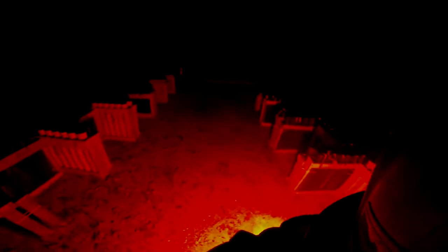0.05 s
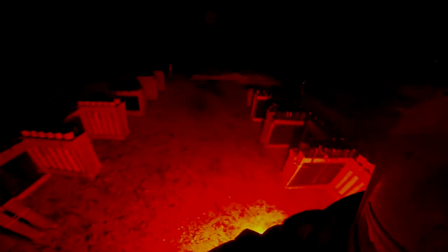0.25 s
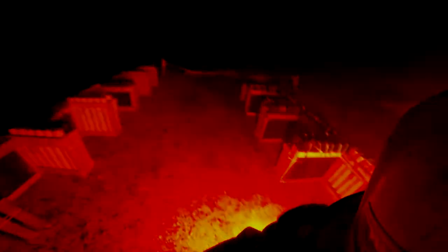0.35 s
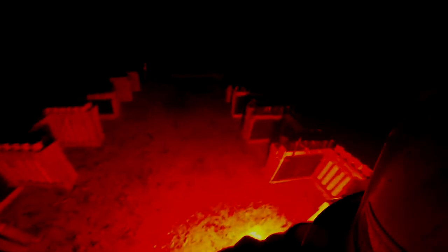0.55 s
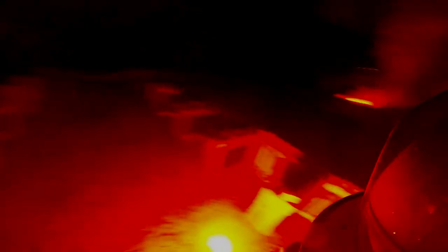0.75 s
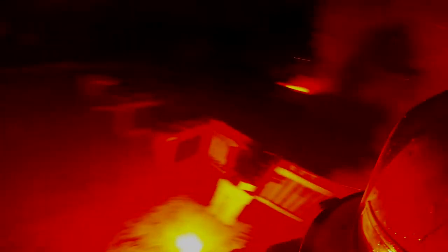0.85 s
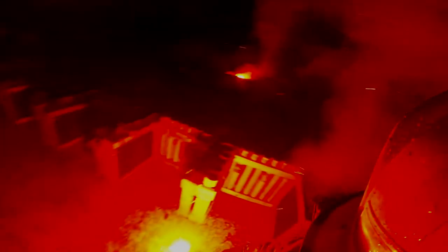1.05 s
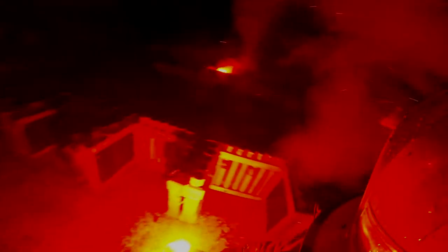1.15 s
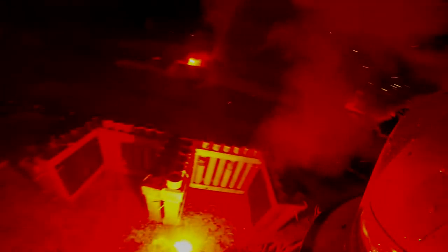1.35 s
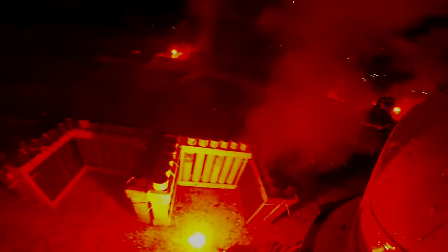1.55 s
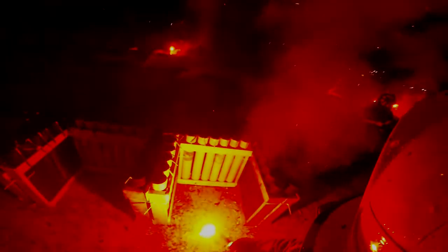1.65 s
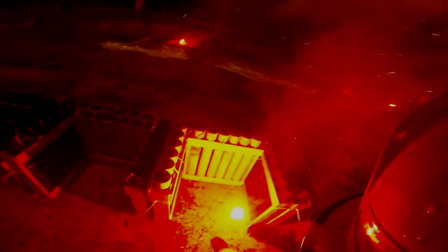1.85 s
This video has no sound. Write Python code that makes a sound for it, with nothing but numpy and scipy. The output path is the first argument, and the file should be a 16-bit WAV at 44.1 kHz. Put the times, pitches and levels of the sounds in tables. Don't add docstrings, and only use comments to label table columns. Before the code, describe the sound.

Firework shells launching from mortar tubes, close, in an open field. Faint flare hiss and rumble, with a soft thump near 0.17 s; then a dense volley of hard, clipped cracks at 0.25-0.32 s, the last heaviest with a hollow tube thump. A smaller double crack comes at 0.48-0.49 s. Echoes roll and dull until about 1.1 s, leaving quiet far rumble, faint puffs near 1.27 and 1.5 s, and light wind buffeting.

```python
import sys
import numpy as np
from scipy import signal
from scipy.fft import rfft, irfft
from scipy.io import wavfile
from scipy.ndimage import uniform_filter1d

SR = 44100
rng = np.random.default_rng(int(sys.argv[2]) if len(sys.argv) > 2 else 0)


def boost_factor(decibels):
    exponent = np.asarray(decibels, float) / 20
    return 10 ** exponent


def unload_wav(signal):
    wavfile.write(
        sys.argv[1],
        SR,
        np.round(np.clip(np.atleast_2d(signal).T, -1, 1) * 32767).astype(np.int16),
    )


N = 85995

# start_s [s], front_db [dB], front_ms [ms], spray_db [dB], decay_ms [ms]
SHOCK_FRONTS = [(.0618, -37, .35, -41, 4), (.2455, -36, .1, -30, 4), (.2480, -24, .12, -26, 2),
                (.2514, -11, .15, -22, 5), (.2491, 1.5, .1, -22, 2), (.24955, -1, .07, -19, 1.5),
                (.2503, -8, .05, -21, 2), (.2585, -6, .12, -17, 3), (.2603, -7, .12, -18, 2),
                (.2619, 2, .17, -16, 2), (.2631, -7, .12, -17, 3), (.2654, -8, .14, -16, 3),
                (.2660, -9, .1, -18, 4), (.2745, -16, .12, -22, 3), (.2762, -14, .12, -18, 3),
                (.2801, -12, .15, -21, 4), (.3030, -30, .15, -26, 6), (.3079, -14, .3, -20, 2),
                (.3096, -4, .25, -16, 2), (.3113, 0, .1, -12, 2), (.3123, -6, .08, -12, 2),
                (.3135, -9, .08, -12, 2), (.3205, -22, .2, -24, 5), (.3144, -4, .2, -14, 1.5),
                (.3152, 2, .18, -16, 1), (.3161, 4, .5, -18, 1.5), (.3180, -4, .08, -11, 1),
                (.4833, -12, .12, -28, 3), (.48362, -3, .11, -22, 2.5), (.49425, -14, .1, -27, 3),
                (.49455, -16, .05, -25, 3)]
# freq_hz [Hz], gain_db [dB]
BLAST_COLOUR = [(200, 0.5), (600, -4), (1050, 2), (1550, 1), (2200, 6), (4000, 5.5), (12000, 6),
                (16000, 12)]
# pitch_hz [Hz], level_db [dB], t60_s [s]
SHELL_MODES = [(2943, -14.5, 0.01), (4720, -11, 0.0051), (8690, -13.5, 0.0089)]
SHARP_MS = 0.059

# start_s [s], level_db [dB], push_ms [ms], ring_hz [Hz]
THUMPS = [(.0, -63, 1.8, 195), (0.164, -30.5, 10, 136), (0.177, -34.5, 2.5, 200), (.2620, -31, 0.41, 280),
          (0.3088, -11.5, 0.41, 200), (0.3156, 2.5, 0.74, 215), (0.324, -16, 3.5, 100),
          (0.352, -24, 1.9, 111), (0.483, -8.5, 1.3, 216), (.4940, -8.5, 1.03, 221),
          (0.5015, -22.5, 1.35, 253), (.520, -32, 1.1, 200), (.557, -32.5, 2.6, 206),
          (0.679, -41, 1.2, 109), (1.109, -44, 4.1, 100)]
RING_CYCLES, RING_GAIN = 5.3, 0.57

# start_s [s], level_db [dB], pitch_hz [Hz], rise_ms [ms], decay_ms [ms]
RINGS = [(0.25, -18.5, 293, 1.3, 4.8), (.2590, -17.5, 547, 2.2, 2), (.2743, -8, 2850, 2.2, 3.2),
         (.2777, -17, 233, 1.2, 12.2), (.2777, -14, 1150, 1.5, 1.5), (.3094, -10, 1055, 4.5, 2.5),
         (.4840, -15, 2750, .6, 1.2), (.3077, -15, 720, 2, 2), (.062, -40, 1760, 0.91, 3.9),
         (.167, -42.5, 1594, 4.9, 8.5), (.2585, -22, 4800, 1.8, 5), (0.19, -46, 1600, 1.9, 4),
         (1, -40.5, 160, 3, 8), (1.013, -42, 166, 4, 10), (1.258, -43, 203, 4, 19),
         (1.291, -42, 130, 6.7, 13), (1.497, -38.5, 131, 5.1, 21), (1.265, -45.5, 2800, 1, 2.2)]

# freq_hz [Hz], t60_s [s]
YARD_DECAY = [(100, 0.35), (400, 0.22), (1500, 0.15), (5000, 0.28), (14000, 0.58)]
# freq_hz [Hz], gain_db [dB]
YARD_COLOUR = [(100, 7.5), (1000, 1.5), (5000, 8), (13000, 5.5)]
YARD_DB = -14.5

# start_s [s], level_db [dB], rise_s [s], decay_s [s]
FAR_BANGS = [(0.0, -34.5, 0.0027, 0.011), (.082, -43, 0.0053, .006), (.250, -32, .002, 0.0077),
             (.259, -19, .003, 0.011), (.272, -19, .003, 0.028), (0.312, -22, .002, 0.0047),
             (.163, -31.5, 0.0012, 0.012), (0.173, -33.5, 0.0025, 0.013), (0.197, -38, 0.003, 0.0029),
             (0.503, -27.5, 0.001, 0.0066), (.514, -30.5, 0.0034, 0.024), (0.547, -32, 0.0027, 0.0079),
             (0.556, -31, 0.0031, 0.0092), (0.633, -39.5, .003, 0.0034), (1.268, -50, 0.0035, .01),
             (1.49, -45.5, 0.015, 0.049)]
# freq_hz [Hz], gain_db [dB]
SCATTER_COLOUR = [(150, -18), (500, -9), (1500, -2), (4000, -1.5), (9000, -1.5), (15000, -18)]

# time_s [s], level_db [dB]
ROLL_LEVEL = [
    (0.0, -59),
    (0.26, -53),
    (0.362, -50.5),
    (0.792, -49),
    (0.916, -49),
    (1.058, -54),
    (1.51, -55.5),
    (1.95, -58.5),
]
# freq_hz [Hz], gain_db [dB]
ROLL_COLOUR = [(60, 17.5), (200, -20.5), (500, -4.5), (1000, -3.5), (3000, 3), (6500, 2.5), (8000, -9.5),
               (15000, -29)]
ROLL_LIFT_DB, ROLL_SPLIT_HZ, ROLL_DULLS_DB_PER_S = 2, 2740, 6.5

# time_s [s], level_db [dB]
FLARE_LEVEL = [(0, -62.5), (.286, -78), (.4, -70), (.48, -67), (.5, -64), (.678, -73), (.95, -85),
               (1.25, -92), (1.4, -79), (1.6, -70), (1.95, -76.5)]
# freq_hz [Hz], gain_db [dB]
FLARE_COLOUR = [(200, -5.5), (600, 8.5), (1500, -7), (2700, -6), (4000, 11.5), (8000, 7.5), (13500, 15),
                (15000, 8)]
FLARE_LIFT_DB = 19

# start_s [s], length_s [s], from_hz [Hz], to_hz [Hz], level_db [dB]
SQUEAK = (1.232, .055, 9950, 10200, -74)

# time_s [s], level_db [dB]
RUMBLE_LEVEL = [(0.0, -48), (0.134, -58.5), (0.26, -55.5), (0.4, -51.5), (0.732, -55.5), (0.922, -57.5),
                (1.2, -57), (1.3, -54.5), (1.42, -54), (1.52, -53), (1.62, -54.5), (1.834, -55.5),
                (1.95, -54)]
# freq_hz [Hz], gain_db [dB]
RUMBLE_COLOUR = [(40, -8.5), (100, 2), (200, -0.5), (300, -10.5), (500, -16.5), (1000, -21.5)]

# time_s [s], level_db [dB]
WIND_LEVEL = [(0.0, -68), (0.032, -44.5), (0.27, -48), (0.32, -30), (0.384, -57), (0.612, -66),
              (0.684, -40.5), (0.744, -57), (0.934, -48.5), (1.216, -55), (1.33, -48), (1.46, -53),
              (1.682, -43.5), (1.732, -55), (1.764, -42), (1.928, -42.5), (1.95, -60)]
# freq_hz [Hz], gain_db [dB]
WIND_COLOUR = [(8, -4.5), (25, 4.5), (40, -10.5), (60, -15.5), (120, -22.5), (400, -50), (1000, -70),
               (8000, -130)]

# freq_hz [Hz], gain_db [dB]
HISS_EDGE = [(13700, 0), (14500, -10), (16000, -60)]
# pitch_hz [Hz], width_hz [Hz], gain_db [dB]
HOUSING_MODES = [(1070, 72, -1), (1542, 151, 8), (2608, 270, 9.5), (3594, 64, 4.5), (4536, 520, 7.5),
                 (6036, 400, 10)]
# freq_hz [Hz], gain_db [dB]
MIC_RESPONSE = [(60, -6), (300, 1.5), (1000, 2), (3000, -5.5), (5000, -14.5), (7500, -14), (14000, -27),
                (16500, -55)]
# freq_hz [Hz], gain_db [dB]
OUTPUT_EDGE = [(14800, 0), (16000, -10), (17200, -50)]
CEILING, KNEE = .98, 8


def evened(x):
    return x / np.sqrt(np.mean(x ** 2) + 1e-20)


def read(points, hz):
    f, value = np.transpose(points)
    return np.interp(np.log(hz + 1), np.log(f + 1), value)


def curve(rows):
    time_s, level_db = np.transpose(rows)
    return boost_factor(np.interp(np.arange(N) / SR, time_s, level_db))


def add(mix, start_s, sound):
    part = mix[max(round(start_s * SR), 0):][:len(sound)]
    part += sound[:len(part)]


def coloured(x, db_at, size=4096):
    cepstrum = irfft(np.log(boost_factor(db_at(np.fft.rfftfreq(size, 1 / SR)))))
    cepstrum[1:size // 2] *= 2
    cepstrum[size // 2 + 1:] = 0
    impulse = irfft(np.exp(rfft(cepstrum)))[:size // 2]
    return signal.oaconvolve(x, impulse)[:len(x)]


def noise(colour, patchy_db, flicker_db, size=512):
    frames, hz = 4 * N // size + 5, np.fft.rfftfreq(size, 1 / SR)
    real, imag, patches = rng.standard_normal((frames, len(hz), 3)).T
    patches = uniform_filter1d(patches, size=6, axis=0)
    patches = evened(uniform_filter1d(patches, size=10, axis=1))
    flicker = evened(uniform_filter1d(rng.standard_normal(frames), size=3))
    tone_db = (read(colour, hz) + read(HISS_EDGE, hz))[:, None]
    z = (real + 1j * imag) * boost_factor(tone_db + patchy_db * patches + flicker_db * flicker)
    return evened(signal.istft(z, nperseg=size, noverlap=3 * size // 4)[1][:N])


def shock(length_s, count):
    u = np.arange(count) / SR / max(length_s, 2e-5)
    return -(1 - u) * np.exp(-u)


def blasts():
    t, out = np.arange(2500) / SR, np.zeros(N)
    grit = rng.standard_normal((len(SHOCK_FRONTS), len(t)))
    modes = sum(boost_factor(db - 60 * t / t60) * np.cos(2 * np.pi * hz * t) for hz, db, t60 in SHELL_MODES)
    shell = np.minimum(t / .00008, 1) * modes
    for (start_s, front_db, front_ms, spray_db, decay_ms), g in zip(SHOCK_FRONTS, grit):
        front = np.pad(shock(front_ms / 1e3, count=200), (9, 0))
        front = uniform_filter1d(front, size=1 + int(15 * front_ms))
        spray = g * np.minimum(t / 0.00051, 1) * np.exp(-1e3 * t / max(decay_ms, .5))
        add(out, start_s, boost_factor(front_db) * front[len(front) - 200 - int(8 * front_ms):])
        add(out, start_s, -boost_factor(front_db) * shell * SHARP_MS / max(front_ms, .03))
        add(out, start_s, boost_factor(spray_db) * np.convolve(spray, front) / np.linalg.norm(front))
    return coloured(out, lambda hz: read(BLAST_COLOUR, hz))


def thumps():
    t, out = np.arange(5000) / SR, np.zeros(N)
    for start_s, level_db, push_ms, ring_hz in THUMPS:
        ring = np.sin(2 * np.pi * ring_hz * t) * boost_factor(-60 * t * ring_hz / RING_CYCLES)
        push = shock(push_ms / 1e3, len(t)) * np.minimum(t / (push_ms * 0.00027), 1)
        add(out, start_s, boost_factor(level_db) * (push - RING_GAIN * ring))
    return out


def rings():
    t, out = np.arange(5000) / SR, np.zeros(N)
    for start_s, level_db, pitch_hz, rise_ms, decay_ms in RINGS:
        swell = np.sin(np.pi / 2 * np.minimum(1e3 * t / max(rise_ms, .2), 1)) ** 2
        decay = np.exp(-np.maximum(1e3 * t - rise_ms, 0) / max(decay_ms, .5))
        add(out, start_s, -boost_factor(level_db) * swell * decay * np.sin(2 * np.pi * pitch_hz * t))
    return out


def yard(x):
    taps = np.zeros(SR // 2)
    at = np.arange(200, len(taps) - 20, 20)
    taps[at + rng.integers(0, 20, len(at))] = rng.choice([-1., 1.], len(at))
    hz, t, z = signal.stft(taps, SR, nperseg=256)
    z = z * boost_factor(read(YARD_COLOUR, hz)[:, None] - 60 * t / read(YARD_DECAY, hz)[:, None])
    tail = signal.istft(z, SR, nperseg=256)[1]
    return signal.fftconvolve(x, tail / np.linalg.norm(tail))[:N]


def far_bangs():
    t, puffs = np.arange(6000) / SR, np.zeros(N)
    grit = rng.standard_normal((len(FAR_BANGS), len(t)))
    for (start_s, level_db, rise_s, decay_s), g in zip(FAR_BANGS, grit):
        rise = np.minimum(t / max(rise_s, .0005), 1)
        decay = np.exp(-np.maximum(t - rise_s, 0) / max(decay_s, .001))
        add(puffs, start_s, boost_factor(level_db) * g * rise * decay)
    return coloured(puffs, lambda hz: read(SCATTER_COLOUR, hz))


def dulling(x):
    low = signal.filtfilt(*signal.butter(2, ROLL_SPLIT_HZ, fs=SR), x)
    return low + (x - low) * boost_factor(-ROLL_DULLS_DB_PER_S * np.arange(N) / SR)


def field_roll():
    roll = dulling(noise(ROLL_COLOUR, patchy_db=1.5, flicker_db=0.8))
    return roll * curve(ROLL_LEVEL) * boost_factor(ROLL_LIFT_DB)


def flare():
    hiss = noise(FLARE_COLOUR, patchy_db=0.0, flicker_db=-0.5)
    return hiss * curve(FLARE_LEVEL) * boost_factor(FLARE_LIFT_DB)


def squeak():
    start_s, length_s, from_hz, to_hz, level_db = SQUEAK
    t, out = np.arange(0, length_s, 1 / SR), np.zeros(N)
    pitch_hz = from_hz + (to_hz - from_hz) * t / length_s
    swell = np.sin(np.pi * t / length_s) ** .5
    add(out, start_s, boost_factor(level_db) * swell * np.sin(2 * np.pi * np.cumsum(pitch_hz) / SR))
    return out


def rumble():
    bursts = noise(RUMBLE_COLOUR, patchy_db=1.5, flicker_db=0.86, size=2048)
    return bursts * curve(RUMBLE_LEVEL) * boost_factor(4.5)


def wind():
    gusts = noise(WIND_COLOUR, patchy_db=-0.3, flicker_db=1.45, size=4096)
    return gusts * curve(WIND_LEVEL)


def housing(hz):
    peaks = sum(db / (1 + ((hz - f) / width) ** 2) for f, width, db in HOUSING_MODES)
    return read(MIC_RESPONSE, hz) + peaks


def scene():
    near = blasts() + thumps() + rings()
    air = near + boost_factor(YARD_DB) * yard(near) + far_bangs() + field_roll() + flare() + rumble()
    return (coloured(air, housing) + wind() + squeak())[None]


def top_cut(x):
    return signal.sosfilt(signal.butter(12, 16320, fs=SR, output="sos"), x)


def record(dry):
    clipped = dry[0] / (1 + np.abs(dry[0] / CEILING) ** KNEE) ** (1 / KNEE)
    finished = coloured(clipped, lambda hz: read(OUTPUT_EDGE, hz))[None]
    return top_cut(finished)


dry = scene()
out = record(dry)
unload_wav(out)
```